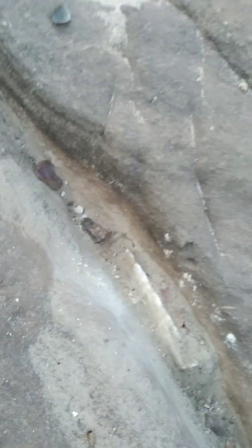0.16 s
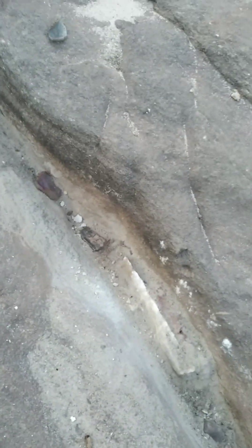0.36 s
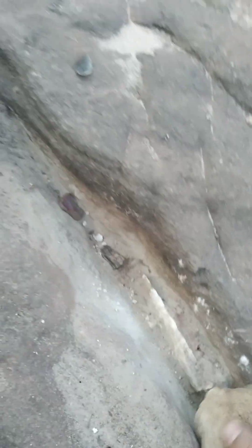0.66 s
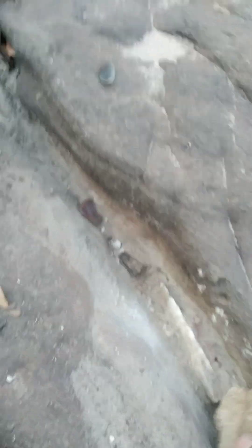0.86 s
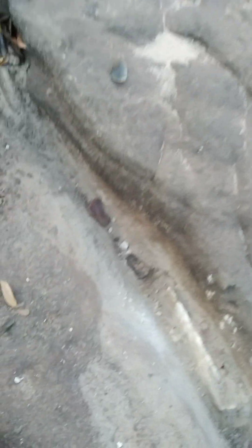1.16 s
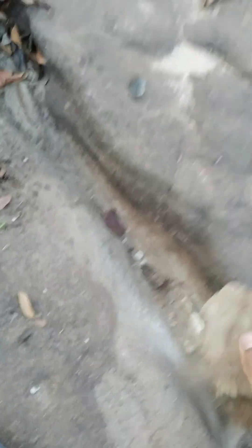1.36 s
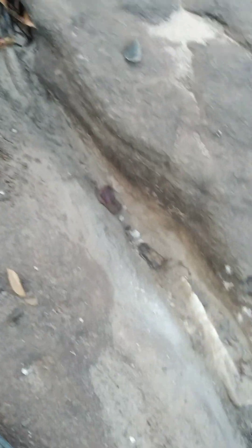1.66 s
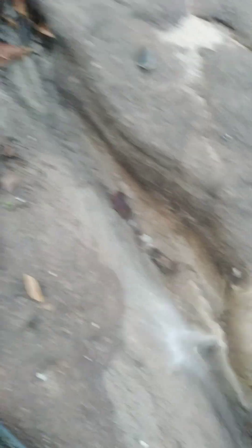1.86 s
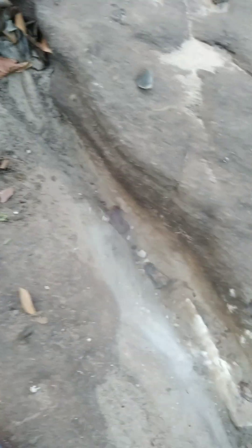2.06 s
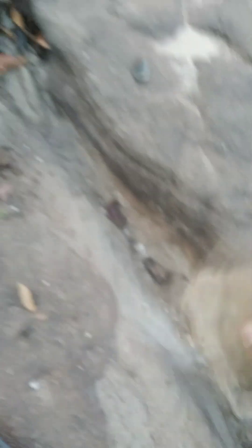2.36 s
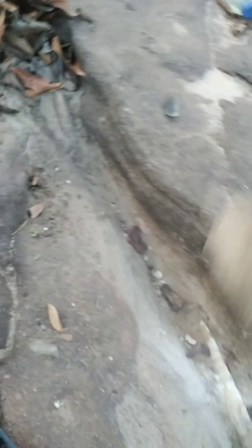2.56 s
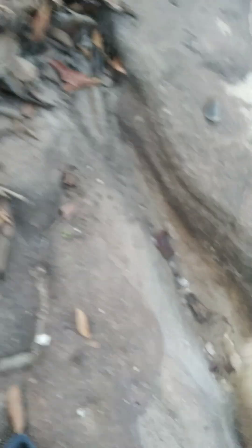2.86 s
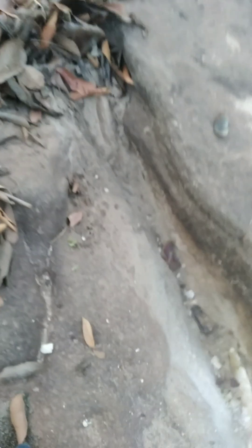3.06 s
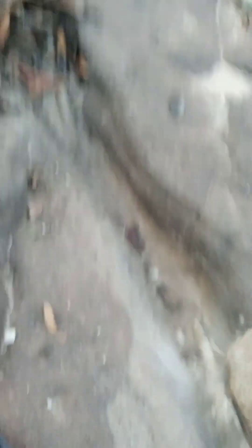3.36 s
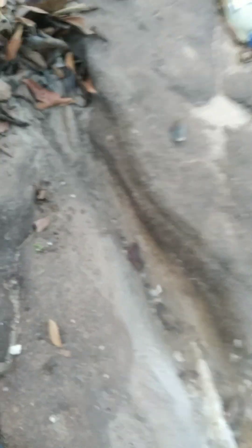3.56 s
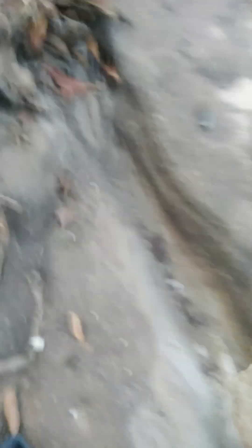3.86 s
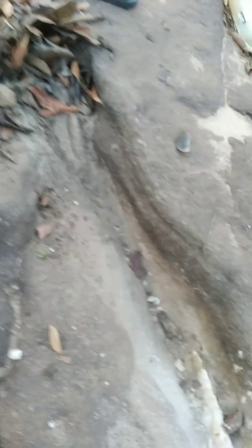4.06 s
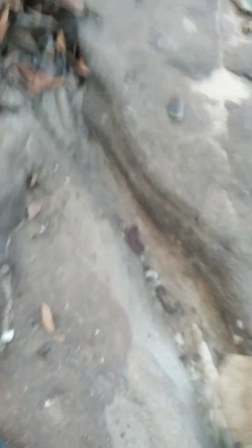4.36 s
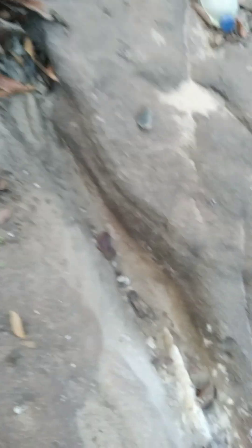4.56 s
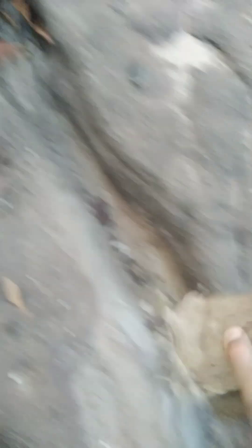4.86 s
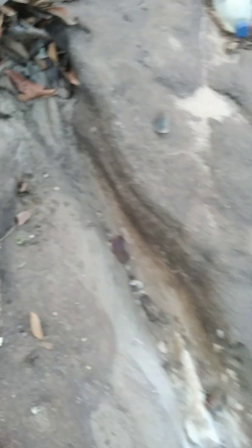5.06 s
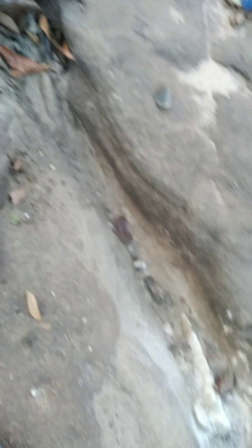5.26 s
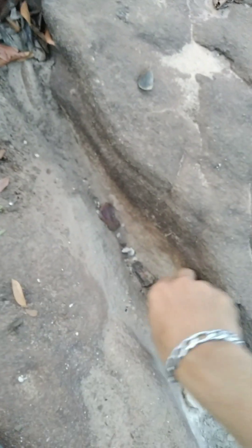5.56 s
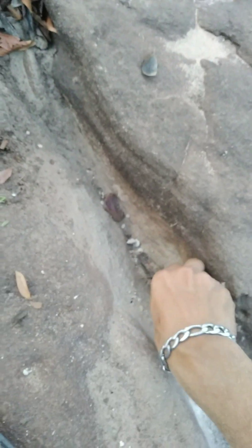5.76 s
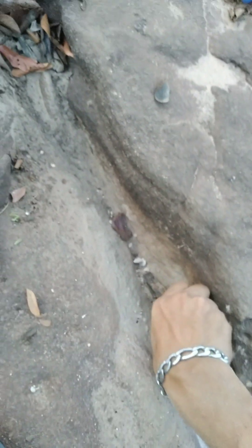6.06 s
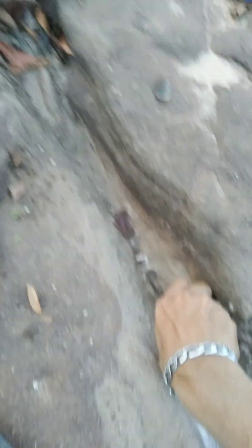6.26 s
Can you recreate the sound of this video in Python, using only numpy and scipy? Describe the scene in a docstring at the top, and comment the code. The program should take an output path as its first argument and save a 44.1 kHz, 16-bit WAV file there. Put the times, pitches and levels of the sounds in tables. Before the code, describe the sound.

A hand-held stone knocks eight times on bedrock, close and sharp, with gritty scrapes and small clicks in quiet outdoor air.

```python
"""A hand-held stone knocked eight times on the bedrock of a dry riverbed, close enough to overload the mics.
Each blow is a dead clack of two contacts; the stone then grinds on crushed grit and catches as it lifts.
Before and after, stones are dragged and set down; chips snap, crumbs trickle and a pebble skids.
A far engine hums under the quiet air. The right microphone faces the stones, the left faces away."""
import sys
import numpy as np
from scipy import signal
from scipy.fft import rfft, irfft
from scipy.io import wavfile

SR = 44100
rng = np.random.default_rng(int(sys.argv[2]) if len(sys.argv) > 2 else 0)


def transcribe(u):
    """Save the signal u as a 16-bit wav file named by the first command-line argument.

    u: samples, shape (n,) or (channels, n), limited to [-1, 1]; the rate is SR.
    q: integer samples, one column per channel.
    """
    v = np.clip(np.atleast_2d(u).T, -1, 1)
    q = np.round(v * 32767).astype(np.int16)
    wavfile.write(sys.argv[1], SR, q)


N = 282448
TIME = np.arange(N) / SR
HIT_SAMPLES = 4096
SWUNG_RING, HELD_RING = 1.1, .85  # ring time factors: a stone swung freely, a stone held down
CHIP_T60_S = .022

# Hard blows, landing on one corner and tipping onto a second. Each row: start in seconds, level in dB,
# pitch factor, tipping time in seconds, second level in dB, second pitch factor, then thud, clink, crack
# and left mic in relative dB, grinding time in seconds, grinding level in dB at its start and at lift-off.
BLOWS = [(1.3314, -11, .87, 0.002117, -4.5, .98, -8, 1, -17.5, -11, 0.047, -52, -54.5),
         (1.8886, -2.5, 1.09, .00153, -3, 1.34, -5, 1.5, -18, -10.5, .075, -57, -47),
         (2.4179, 7, 1.056, .00238, 1.5, 0.94, -13, -12, -19, -15, .062, -49, -51),
         (2.8805, 5.5, 1.014, .0085, 4.5, 0.84, -17, -11.5, -17, -10, .071, -37.5, -31.5),
         (3.3729, -4, 1.53, .0026, 3, 1.14, 4, -2, -16, -12.5, .066, -40.5, -37),
         (3.8609, -3.5, 1.15, .00224, 5, 1.24, -25, -4.5, -16.5, -6.5, .06, -33, -42),
         (4.3724, -2, 1.33, .0024, -2.5, 1.08, -7.5, 3, -20, -12.5, .081, -33.5, -41),
         (4.8838, -2.5, 1.39, .0025, -5.5, 1.07, -9, -2, -10, -9, .069, -40, -35)]
# Spectrum of a snapping splinter. Each row: frequency in Hz, relative level in dB.
CHIP_SPECTRUM = [(300, -14), (1000, -4.5), (2400, 4), (3800, -4), (5000, -8), (7000, -15.5), (10000, -22),
                 (15000, -25)]


def from_db(db):
    """Decibels to gain."""
    return 10 ** (np.asarray(db) / 20)


def rms_one(x):
    """Scale to unit rms."""
    return x / np.sqrt(np.mean(x ** 2) + 1e-20)


def at_hz(points, hz):
    """Read a table on a log-frequency axis."""
    f, value = np.transpose(points)
    return np.interp(np.log(np.maximum(hz, 1)), np.log(f), value)


def colour(x, spectrum):
    """Causal (minimum-phase) filter with the given spectrum."""
    n = x.shape[-1]
    gain = from_db(at_hz(spectrum, np.fft.rfftfreq(n, 1 / SR)))
    cepstrum = irfft(np.log(gain), n)
    cepstrum[1:n // 2] *= 2
    cepstrum[n // 2 + 1:] = 0
    return irfft(rfft(x) * np.exp(rfft(cepstrum)), n)


def low_pass(x, hz, order=2):
    """Butterworth low-pass."""
    return signal.sosfilt(signal.butter(order, min(hz, .45 * SR), fs=SR, output="sos"), x + 1e-18)


def drift(per_s, size=N):
    """Wander between random values of spread 1."""
    knots = rng.standard_normal(1000)
    return np.interp(TIME[:size] * per_s, np.arange(len(knots)), knots)


def place(out, start, sound, left_db):
    """Add a sound at start seconds; the left microphone faces away and hears it weaker."""
    i = max(int(start * SR), 0)
    part = sound[:N - i]
    out[:, i:i + len(part)] += np.outer([from_db(left_db), 1], part)


def ring(modes, pitch, lasting=1):
    """Damped sines struck together; grip and point of contact shift their pitch and ring time."""
    hz, db, t60 = np.transpose(modes)[:, :, None]
    t = TIME[:HIT_SAMPLES]
    return np.sum(from_db(db - 60 * t / (t60 * lasting)) * np.sin(2 * np.pi * hz * pitch * t), axis=0)


def open_air(gain_db=10):
    """Soft, low air over the riverbed, mostly different at each microphone."""
    # Spectrum of the air. Each row: frequency in Hz, relative level in dB.
    spectrum = [(12, -27), (20, 15), (33, -12.5), (72, -2.5), (94, -12.5), (135, -11.5), (310, -14),
                (347, -16), (571, -20), (713, -23.5), (1830, -31.5), (2100, -34.5), (2340, -33.5),
                (4950, -49), (15000, -63.5)]
    # Its slow rise and fall. Each row: time in seconds, level in dB before the gain.
    swell = [(0.0, -59), (1.18, -63.5), (2.65, -65), (4.62, -65), (5.9, -59), (6.4, -64.5)]
    noise = rng.standard_normal((3, N))
    air = rms_one(colour(noise[:2] + .082 * noise[2], spectrum))
    return air * from_db(np.interp(TIME, *np.transpose(swell)) + gain_db + 1.1 * drift(2.7))


def far_engine(gain_db=-1):
    """An engine a long way off hums, each partial wavering in level and phase."""
    # The hum's partials. Each row: frequency in Hz, level in dB before the gain.
    partials = [(63, -61.5), (127, -65), (159, -67), (192, -71.5)]
    return sum(from_db(db + gain_db + 2 * drift(3)) * np.sin(2 * np.pi * hz * TIME + 2 * drift(5))
               for hz, db in partials)


def slips(size, per_s, spread_db, clump_db):
    """Stick and slip: a stream of uneven clicks that come in clumps."""
    sizes = from_db(spread_db * np.minimum(rng.exponential(1, size), 3) + clump_db * drift(170, size))
    return sizes * rng.choice([-1, 1], size) * (rng.random(size) < per_s / SR)


def scrape(length_s, pressure_db, bright_hz, ring_db, hollow_db, edge_s=.004, points=5):
    """Sliding stone crushes fine grains; each coarser slip rings stone and bed at one of a few points."""
    # Spectrum of crushed grit. Each row: frequency in Hz, relative level in dB.
    grit_spectrum = [(100, -10.5), (400, 6.5), (750, 3), (1300, 0), (2300, 1.5), (4000, -12), (5400, -13.5),
                     (7000, -15.5), (10000, -17), (15000, -25.5)]
    # Modes of the stone and of its hollow bed. Each row: Hz at pitch 1, relative dB, t60 in seconds.
    stone_modes = [(1690, 0.5, 0.018), (2407, -3.5, 0.017), (3350, -14, 0.0045), (4339, -10.5, 0.019)]
    bed_modes = [(451.7, -13.5, 0.011), (1063.8, -0.5, 0.033)]
    size, rings = SR // 3, 0
    coarse = slips(size, per_s=920, spread_db=4.5, clump_db=3)
    fine = slips(size, per_s=4000, spread_db=2.5, clump_db=5.5)
    grit = rms_one(colour(coarse + .5 * fine, grit_spectrum))
    point_of_slip = rng.integers(0, points, size)
    for point, pitch in enumerate(1.05 + .025 * rng.standard_normal(points)):
        body = ring(stone_modes, pitch) + from_db(hollow_db) * ring(bed_modes, pitch)
        rings = rings + signal.fftconvolve(coarse * (point_of_slip == point), body)[:size]
    rasp = low_pass(grit + from_db(ring_db) * rms_one(rings), bright_hz, order=1)
    t = TIME[:size]
    t = t[t < length_s + edge_s]
    stumbles = from_db(3 * drift(per_s=110, size=len(t)))  # the hand stumbles over the grains
    touching = np.clip(np.minimum(t, t[-1] - t) / edge_s, 0, 1)
    pressure = from_db(np.interp(t, np.linspace(0, t[-1], len(pressure_db)), pressure_db))
    return rms_one(stumbles * rasp[-len(t):]) * touching * pressure


def drags(swell_db=.5, bright_hz=4294):
    """A stone is shifted over grit in short strokes, each swelling slightly."""
    # The strokes. Each row: start and end in seconds, level in dB, ringing and hollow bed in relative dB.
    strokes = [(0, .12, -47, 4, 10), (0.124, 0.427, -64.5, 23, 7.5), (0.434, 0.547, -41.5, 13, -1),
               (0.556, 0.568, -41.5, 5.5, 3), (0.61, .649, -42.5, 8, 4), (0.658, 0.676, -43.5, 1, 9),
               (0.84, 0.868, -45, 17.5, 4.5), (1.083, 1.216, -66.5, -0.5, 0.5), (2.06, 2.109, -48, -8, -3),
               (2.681, 2.696, -50, -6, -18.5), (3.466, 3.72, -66.5, -9, -1.5),
               (5.788, 5.855, -53.5, -6, -2), (5.885, 5.993, -47, 3.5, -0.5), (6.002, 6.088, -45.5, 1.5, 4),
               (6.093, 6.162, -53.5, 2, -6)]
    out = np.zeros((2, N))
    for start, end, db, ring_db, hollow_db in strokes:
        pressure_db = [db - swell_db / 2, db + swell_db / 2]
        place(out, start, scrape(end - start, pressure_db, bright_hz, ring_db, hollow_db), left_db=-10)
    return out


def snap(spectrum, t60):
    """A brittle snap: coloured noise that dies at once, peak 1."""
    burst = colour(rng.standard_normal(HIT_SAMPLES) * from_db(-60 * TIME[:HIT_SAMPLES] / t60), spectrum)
    return burst / np.abs(burst).max()


def contact(pitch, thud_db, clink_db, crack_db, lasting):
    """Each contact rings the stone, thuds the bed and crushes grains; a blunt contact dulls the ring."""
    # Low, middle and high modes of stone on rock. Each row: Hz at pitch 1, relative dB, base t60 in seconds.
    thud = [(120, -22, .012), (300, -16, .015), (450, -9, .018)]
    clack = [(690, -10, .012), (850, 0, .014), (1020, -9, .016)]
    clink = [(1500, -5, .015), (1670, -9, .014), (2320, -7, .013), (3000, -13, .012), (4300, -24, .011),
             (6000, -28, .009)]
    # Spectrum of cracking grains. Each row: frequency in Hz, relative level in dB.
    crack_spectrum = [(500, -10), (1500, -1.5), (3000, 7.5), (5000, -5), (8000, -30), (12000, -26),
                      (15500, -23)]
    groups = [(thud, thud_db), (clack, 0), (clink, clink_db)]
    body = sum(from_db(db) * ring(modes, pitch, lasting) for modes, db in groups)
    crack = from_db(crack_db) * snap(crack_spectrum, t60=.015)
    cutoff_hz = 2593 * 2 ** (clink_db / 31)  # a shorter contact clinks more and is brighter
    return low_pass(body, cutoff_hz) + crack


def knocks(sharper_db=3.5, low_cut_hz=140):
    """A light tap is one contact; a hard blow is two, milliseconds apart, the first corner sharper."""
    # Light taps. Each row: start in seconds, level in dB, pitch factor, thud, clink and crack in relative dB.
    taps = [(0.2619, -27.5, 1.21, 0.5, -11.5, -26), (.8025, -30, 0.95, 16, -2.5, -12),
            (1.9591, -28.5, 1.06, 8, 1, -13.5), (2.103, -36, 1.24, 1, 6.5, -27.5),
            (2.173, -36.5, 1.53, -7, 9.5, -26.5), (3.4065, -17, 1.35, 13.5, 9.5, 0.5),
            (5.3684, -14.5, .9, -15, -7.5, -10), (5.4064, -12, 1.44, -30, -9.5, -35),
            (5.4475, -18.5, 1, 21, -23, -23), (5.478, -26.5, 1.02, 7.5, -8, -29),
            (5.561, -32, 1.43, 14.5, 9.5, -14), (5.6582, -36, 0.97, 17.5, -6, -9),
            (5.8086, -19.5, 1.03, -22, -19, -19.5), (5.8386, -14, 1.15, -24, -16, -22),
            (5.9026, -31, 1.3, 16.5, 4, -22), (6.0522, -27.5, 1.1, 21, -4, -1.5)]
    out = np.zeros((2, N))
    for start, db, pitch, tip_s, second_db, second_pitch, thud_db, clink_db, crack_db, left_db, *_ in BLOWS:
        first = contact(pitch, thud_db, clink_db + sharper_db, crack_db, SWUNG_RING)
        second = contact(second_pitch, thud_db, clink_db, crack_db, SWUNG_RING)
        place(out, start, from_db(db) * first, left_db)
        place(out, start + tip_s, from_db(second_db) * second, left_db)
    for start, db, pitch, thud_db, clink_db, crack_db in taps:
        tap = contact(pitch, thud_db, clink_db, crack_db, HELD_RING)
        place(out, start, from_db(db) * tap, left_db=-10.5)
    # the knocks carry little deep bass
    return signal.sosfilt(signal.butter(2, low_cut_hz, "high", fs=SR, output="sos"), out + 1e-18)


def chips():
    """Loose splinters tick brightly as they snap and land."""
    # The ticks. Each row: start in seconds, peak level in dB.
    ticks = [(0.7885, -34), (2.311, -48.5), (2.703, -26), (2.787, -44), (3.030, -38.5), (3.746, -37.5),
             (4.11, -47.5), (5.499, -45.5), (5.897, -34.5), (6.002, -35.5)]
    out = np.zeros((2, N))
    for start, db in ticks:
        place(out, start, from_db(db) * snap(CHIP_SPECTRUM, CHIP_T60_S), left_db=-9.5)
    return out


def grinding(sag_db=3, catch_lead_s=.0052):
    """After each blow the stone grinds, the pressure sagging midway, and catches as it is pulled away."""
    out = np.zeros((2, N))
    for start, *_, grind_s, grind_db, lift_db in BLOWS:
        pressure_db = [grind_db, (grind_db + lift_db) / 2 - sag_db, lift_db]
        grind = scrape(grind_s, pressure_db, bright_hz=2600, ring_db=6.5, hollow_db=-7)
        catch = contact(pitch=1.08, thud_db=0, clink_db=8, crack_db=-17, lasting=HELD_RING)
        place(out, start, grind, left_db=-10)
        place(out, start + grind_s - catch_lead_s, from_db(lift_db) * catch, left_db=-10)
    return out


def crumbs(start=1.9, end=4.85, softest_db=-62, spread_db=9, count=70):
    """Knocked-off crumbs trickle faintly over the rock."""
    out = np.zeros((2, N))
    for when, size in rng.random((count, 2)):
        tick = from_db(softest_db + spread_db * size ** 2) * snap(CHIP_SPECTRUM, CHIP_T60_S)
        place(out, start + when * (end - start), tick, left_db=-5)
    return out


def pebble(start=5.58, level_db=-41, t60=.17):
    """A nudged pebble skids and chinks briefly as it comes to rest."""
    # The pebble's modes. Each row: Hz at pitch 1, relative dB, t60 in seconds.
    modes = [(2490, 7.5, 0.014), (3250, -17, 0.01), (4080, -3.5, 0.014)]
    out, size = np.zeros((2, N)), 2 * HIT_SAMPLES
    clicks = slips(size, per_s=1000, spread_db=4, clump_db=5.5)
    skid = signal.fftconvolve(clicks, ring(modes, pitch=.994))[:size]
    slowing = from_db(-60 * TIME[:size] / t60)
    place(out, start, from_db(level_db) * slowing * rms_one(skid), left_db=-3)
    return out


def microphones(x):
    """Sound bends round the housing to the left microphone, which changes its colour and phase."""
    # Left mic against right. Each row: frequency in Hz, gain in dB.
    left_colour = [(100, -12), (500, -4), (1000, -2.5), (2200, 2), (4500, 4.5), (9000, 4.5), (15000, -1.5)]
    # Each row: frequency in Hz, phase shift in radians.
    left_phase = [(20, -2.5), (200, 2), (550, -0.5), (1000, 1.42), (1700, 1.11), (3500, 1.87), (15000, 1.5)]
    hz = np.fft.rfftfreq(N, 1 / SR)
    bend = from_db(at_hz(left_colour, hz)) * np.exp(1j * at_hz(left_phase, hz))
    return np.array([irfft(rfft(x[0]) * bend, N), x[1]])


def riverbed(x, rocks_db=-32, rocks_t60=.055, banks_db=-50, banks_t60=.64, dull_hz=3200):
    """Nearby rocks scatter a short tail, the banks a faint long one; both are weaker on the left."""
    t = TIME[:SR // 2]
    echoes = 0
    for db, t60 in [(rocks_db, rocks_t60), (banks_db, banks_t60)]:
        tail = low_pass(rng.standard_normal((2, len(t))), dull_hz) * from_db(-60 * t / t60) * (t > .003)
        echoes = echoes + from_db(db) * tail / np.sqrt(np.sum(tail ** 2, axis=1, keepdims=True))
    return signal.fftconvolve(x[1:], echoes, axes=1)[:, :N] * from_db([[-5], [0]])


def scene():
    """Stones close to the microphones, the riverbed around them, air and engine beyond."""
    stones = knocks() + chips() + grinding() + drags() + pebble() + crumbs()
    foreground = microphones(stones) + riverbed(stones)
    background = (open_air() + far_engine()) * from_db([[-2], [2.5]])  # louder on the right
    return foreground + background


def record(dry, stopband_hz=16500):
    """The hard blows overload the microphones and clip flat; a steep filter cuts the top."""
    return signal.sosfilt(signal.cheby2(14, 60, stopband_hz, fs=SR, output="sos"), np.clip(dry, -1, 1))


dry = scene()
out = record(dry)
transcribe(out)
```